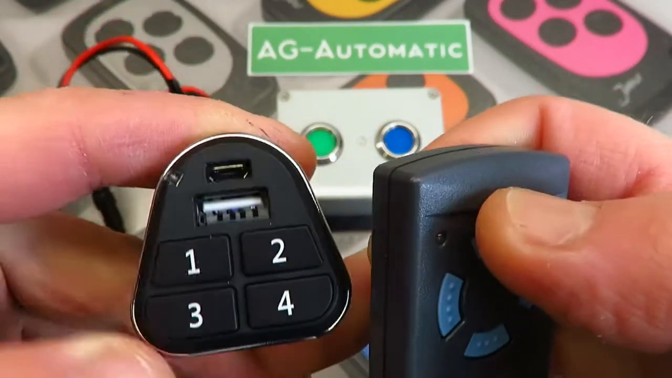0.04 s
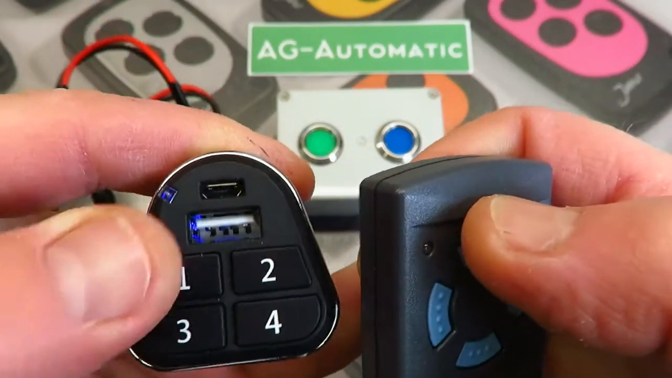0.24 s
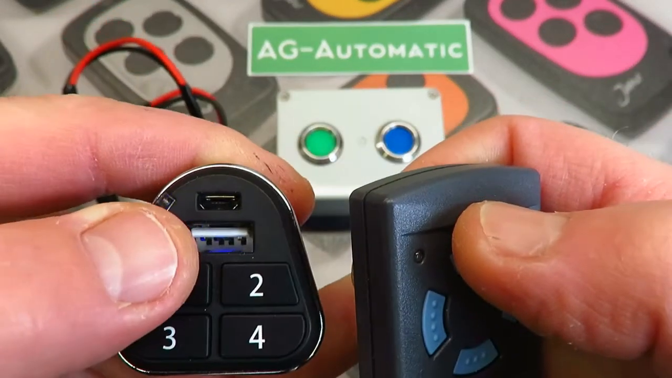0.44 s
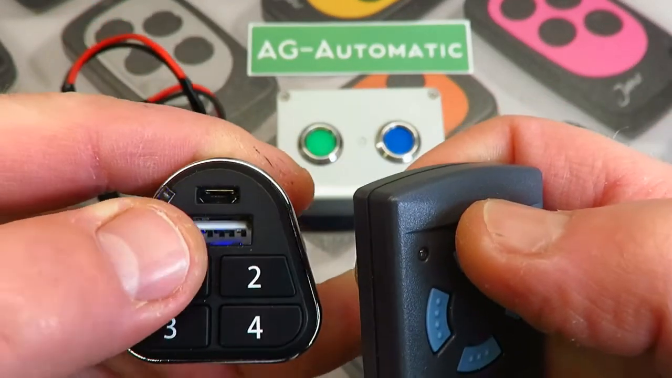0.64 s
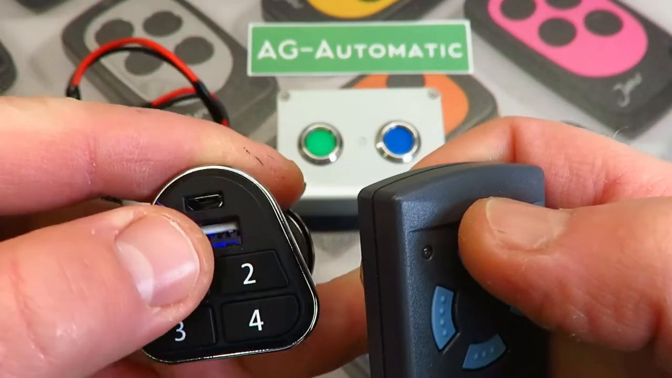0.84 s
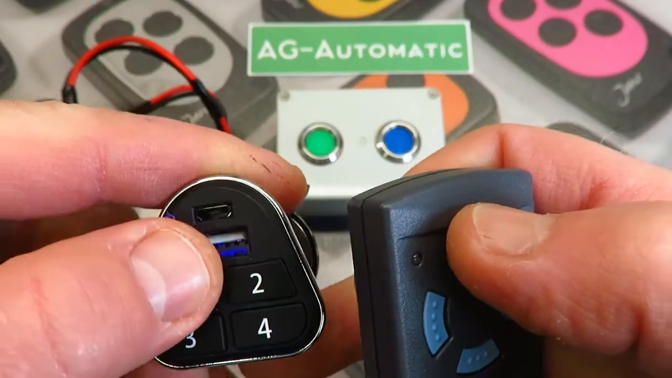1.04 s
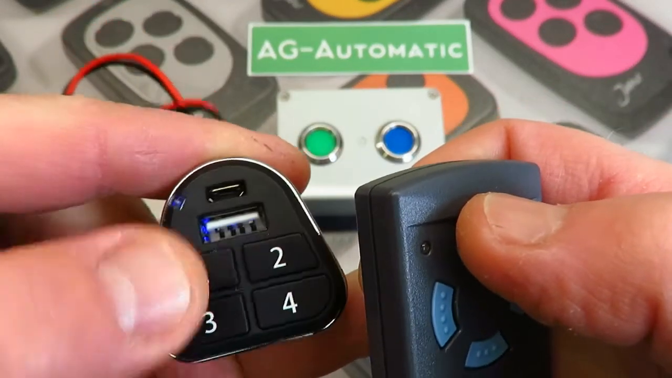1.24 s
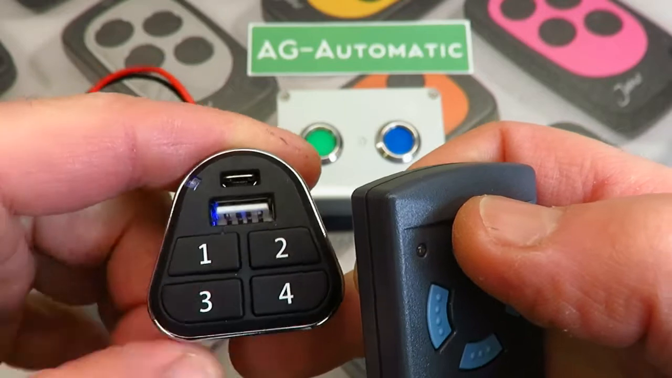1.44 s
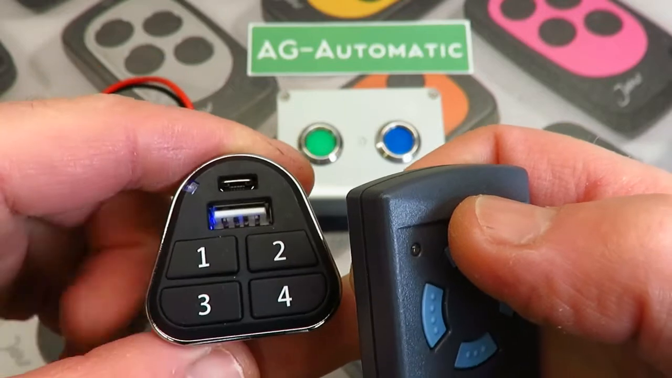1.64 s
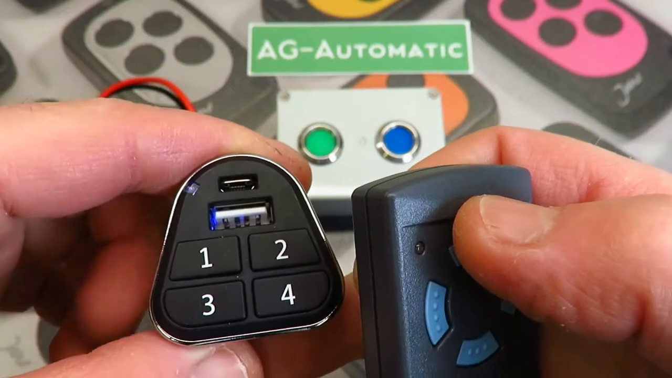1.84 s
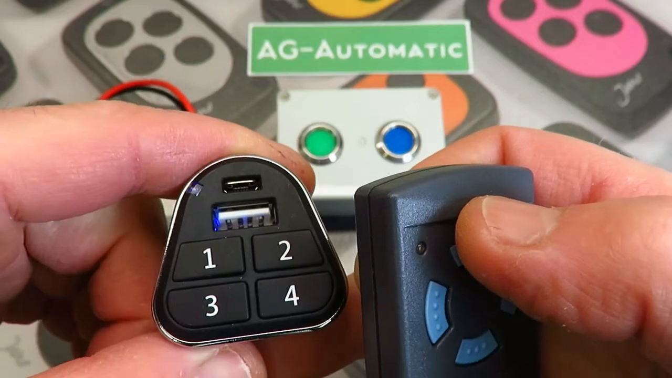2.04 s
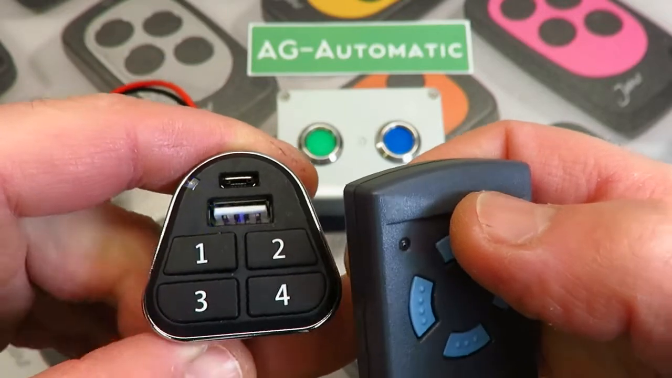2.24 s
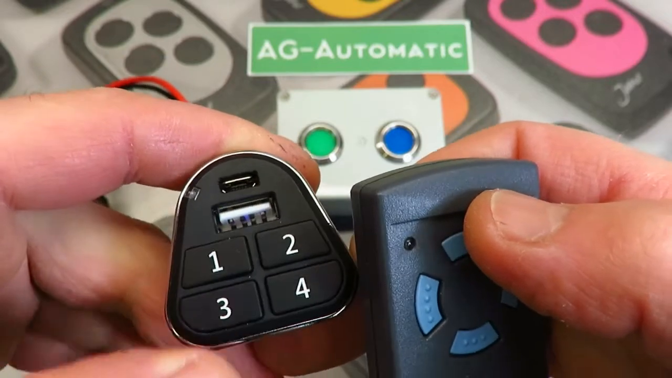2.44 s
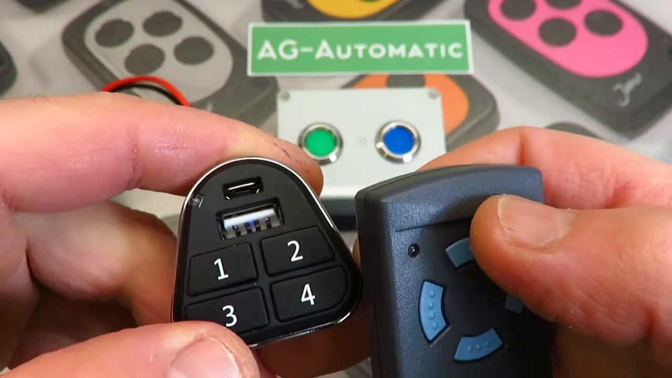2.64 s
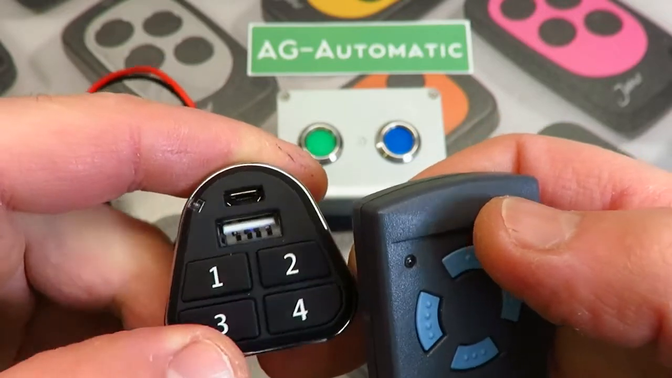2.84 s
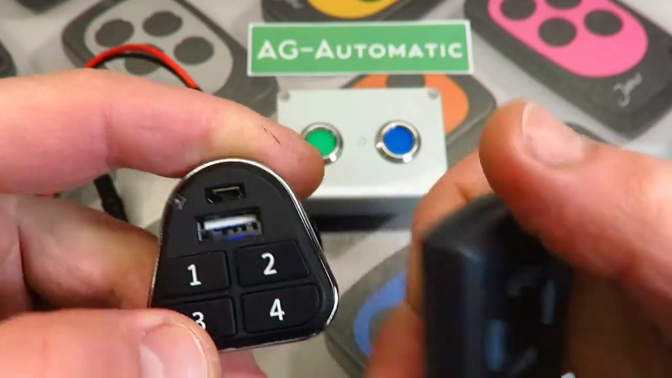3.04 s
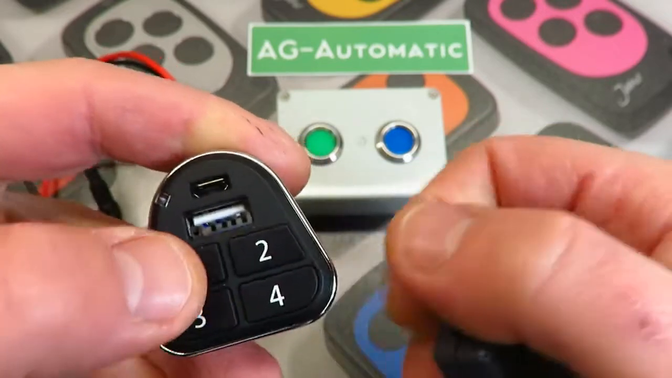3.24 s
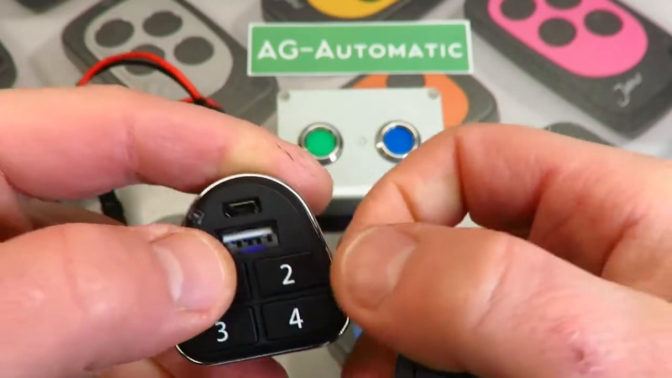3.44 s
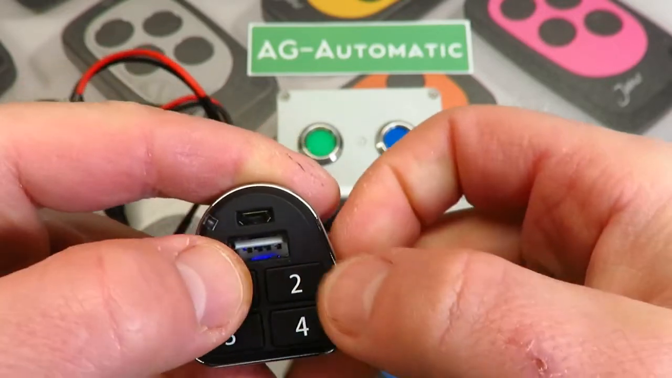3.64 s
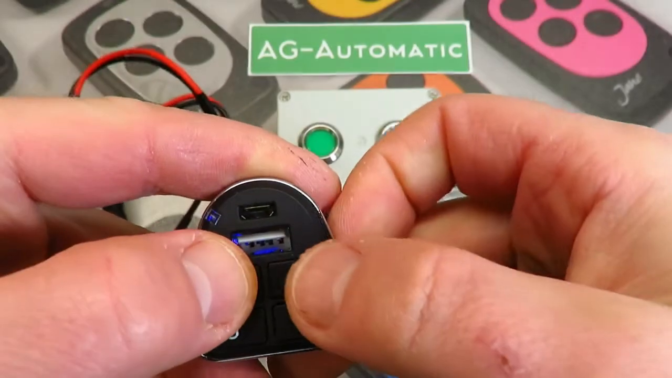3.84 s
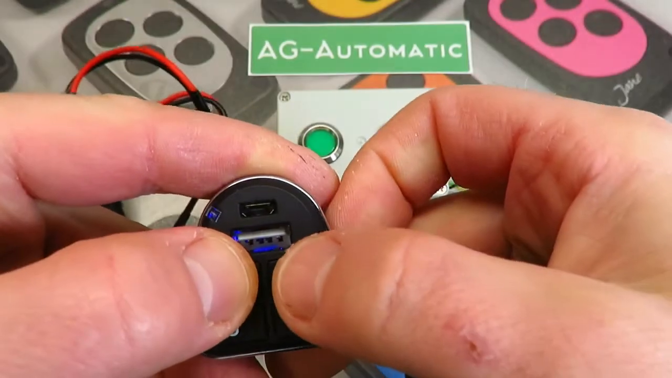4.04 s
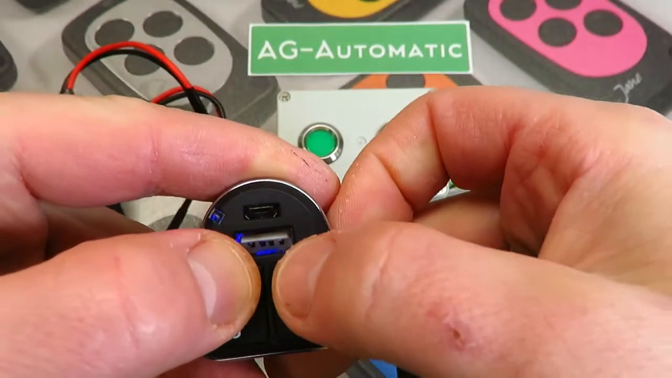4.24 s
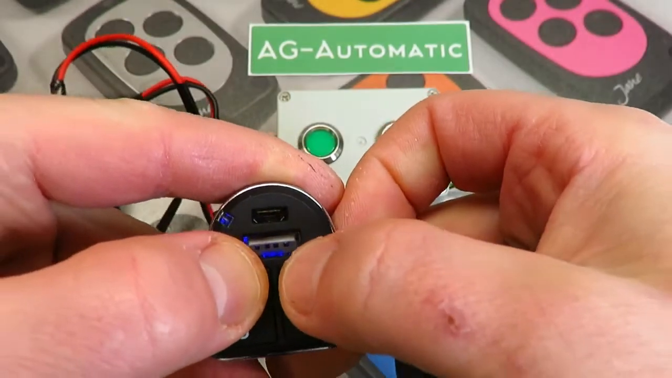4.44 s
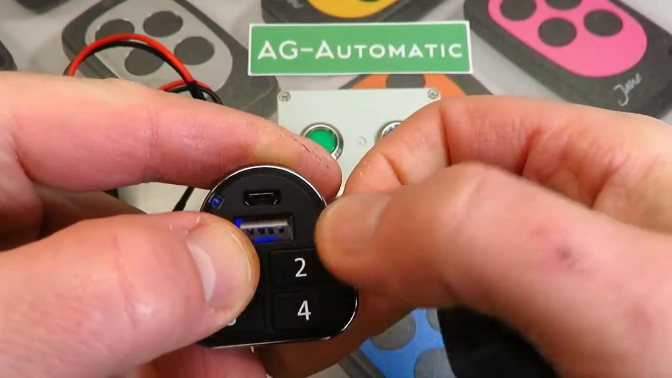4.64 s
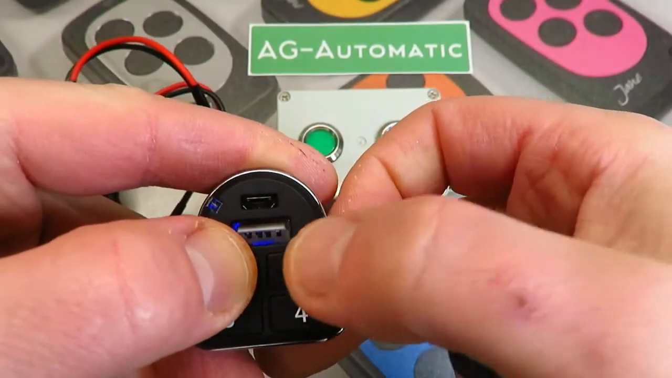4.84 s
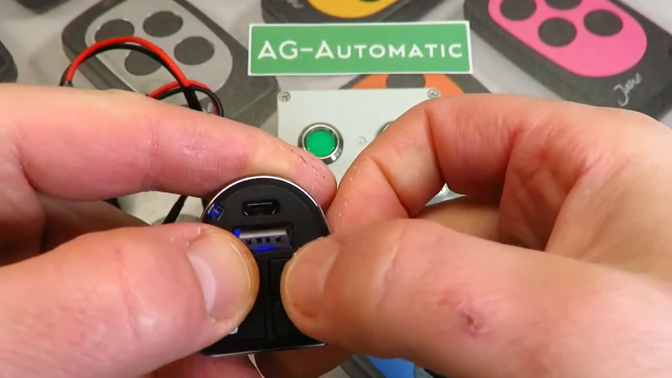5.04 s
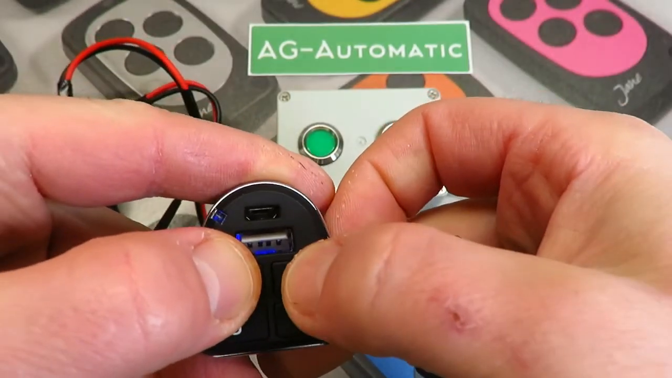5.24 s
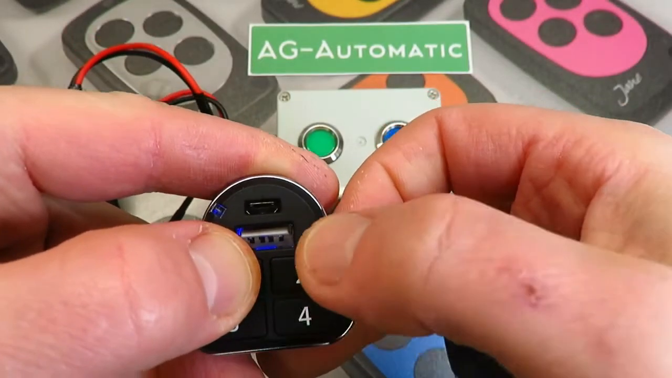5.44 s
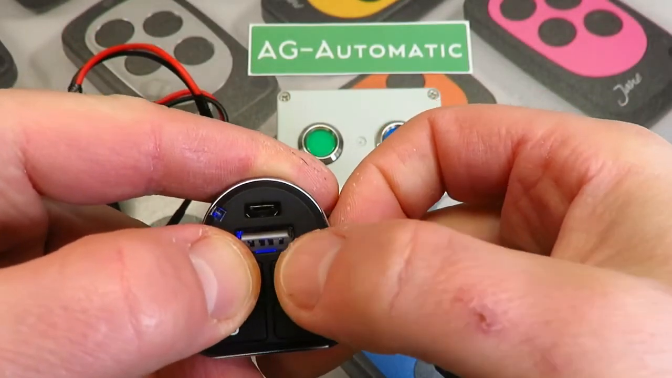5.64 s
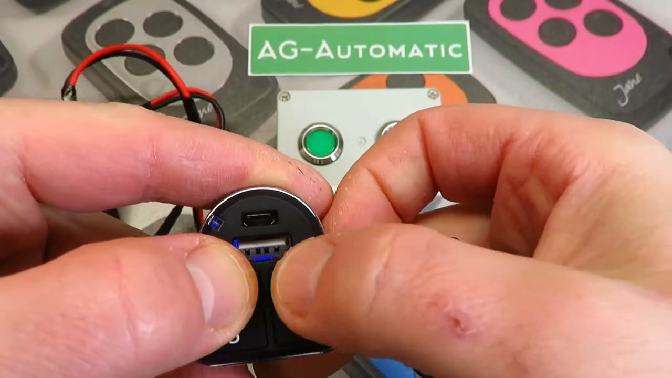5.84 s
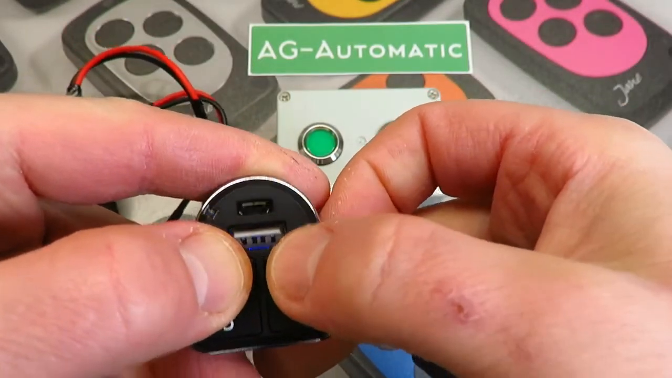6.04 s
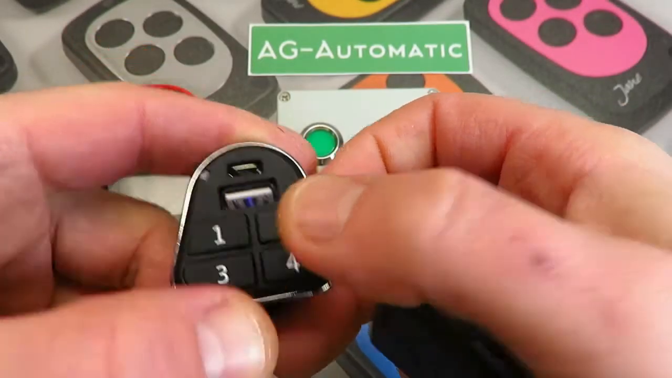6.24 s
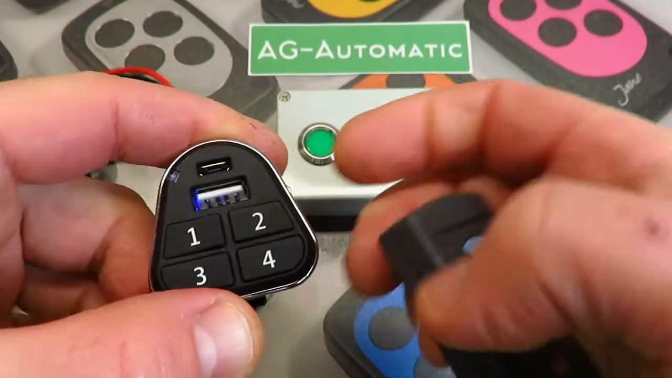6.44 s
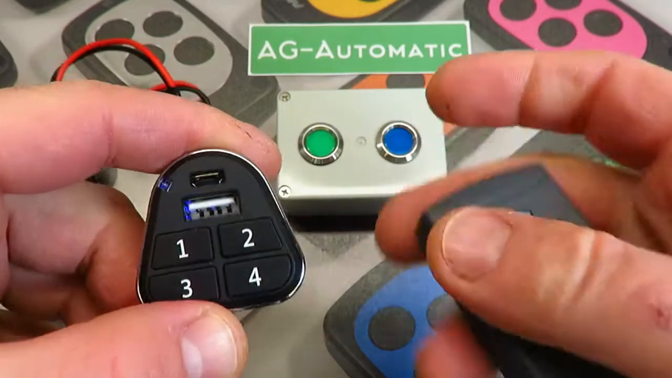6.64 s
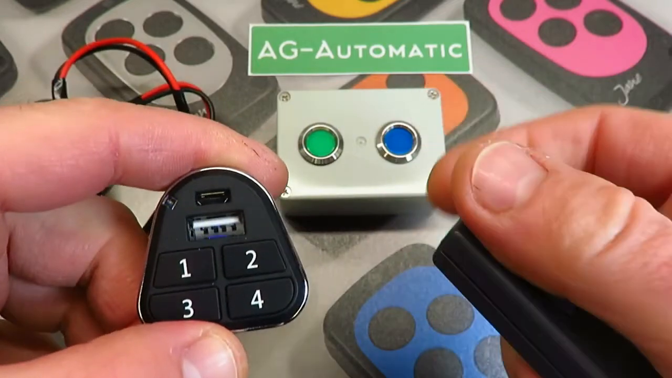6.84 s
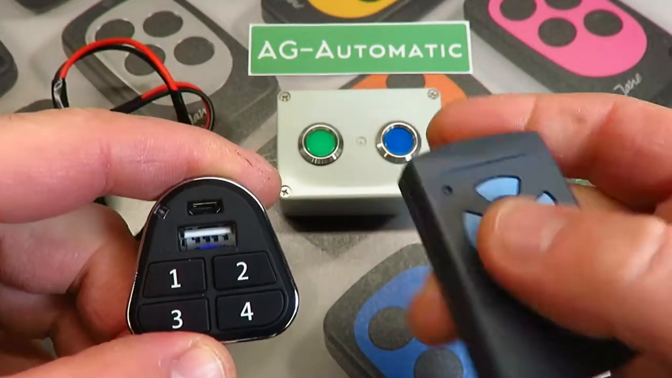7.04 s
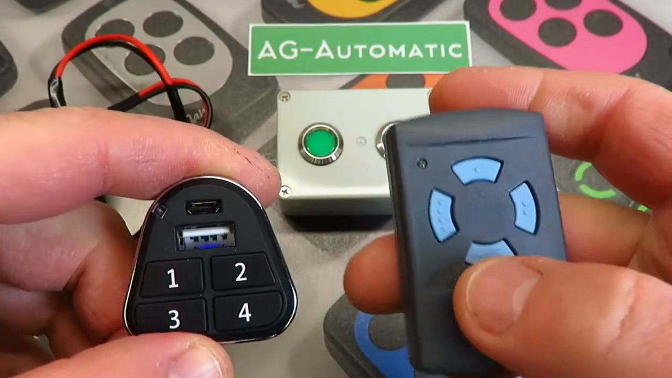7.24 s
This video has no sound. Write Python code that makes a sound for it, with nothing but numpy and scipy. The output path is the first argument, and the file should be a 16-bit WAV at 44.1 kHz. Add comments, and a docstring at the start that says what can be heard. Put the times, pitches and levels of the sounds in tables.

```python
"""In a quiet room, at a table, two small plastic remote controls are handled close to the microphone.
Thumbs press and release snap-dome buttons: each double crack rings briefly in the hollow case.
Light taps ring the same case. Skin slides over the plastic as bursts of tiny slips, and sometimes catches.
The hands shift with a dull rustle and soft bumps, all made from filtered grains and short tones.
Shaped noise gives the room rumble, the microphone hiss and a faint, thin band of hiss at the very top."""
import sys
import numpy as np
from scipy import signal
from scipy.fft import rfft, irfft, next_fast_len
from scipy.io import wavfile

SR = 44100
rng = np.random.default_rng(int(sys.argv[2]) if len(sys.argv) > 2 else 0)


def wav_record(signal):
    """Record a signal, one row per channel, as 16-bit PCM in the file named by sys.argv[1]."""
    frames = np.transpose(np.atleast_2d(signal))
    bounded = np.clip(frames, -1, 1)
    # unit amplitude maps onto the largest positive 16-bit level
    quanta = np.round(bounded * 32767).astype(np.int16)
    wavfile.write(sys.argv[1], SR, quanta)


N = 322371
TIME = np.arange(N) / SR

# A dome snaps down under the thumb. Columns:
# start_s, main_level_db (over 10 ms), main_pitch_hz, snap_pitch_hz, landing_delay_s,
# landing_db, after_ring_db, scatter_db,
# then levels relative to the main band: knock_db, body_db, snap_db, tick_db, air_db
BUTTON_PRESSES = [(0.5014, -34.5, 2880, 3920, 0.00037, 2.5, -14, -1.5, -28, -7.5, -1.5, -18, -33),
                  (1.0911, -20.5, 2400, 4360, 0.00078, -10, -16, -5.5, -25.5, -12.5, -5.5, -18.5, -24.5),
                  (3.8761, -17.7, 2500, 5120, 0.00074, -10, -33, -9, -24.5, -15, -6, -5, -20),
                  (4.4533, -20.5, 3010, 4580, 0.00031, -11, -16, -11.5, -32, -16.5, -2, -10, -25),
                  (5.261, -19, 2880, 5000, 0.00038, -4.5, -15, -8, -57, -15, -2.5, -25, -16),
                  (5.9984, -23.5, 2910, 5170, 0.000435, -10.5, -16, -10.5, -28, -8, -0.5, -16, -15.5)]
# A dome springs back up: same columns and units as the presses
BUTTON_RELEASES = [(1.3052, -26, 2134, 4140, 0.00077, -18, -20, -8.5, -17, -5.5, -32, -29, -32),
                   (4.6902, -30, 3050, 3770, 0.00065, -9, -8, -10.5, -23.5, -7.5, -40, -10, -15),
                   (5.4414, -34.5, 2790.0, 4280, 0.00054, -9, -11, -12, -23, -12.0, -10, -21, -51),
                   (6.2065, -35, 2030.0, 4390.0, 0.0007, -6, -37, -10, -15, -6, -33.0, -39.0, -48.0),
                   (6.2584, -23, 2120, 3720, 0.00149, -9, -1, -5.5, -21.5, -8.5, -28, -31, -45)]


def buttons():
    """Pressed domes snap short and bright; released domes sound duller and longer."""
    out = np.zeros((2, N))
    for row in [*BUTTON_PRESSES, *BUTTON_RELEASES]:
        start_s, level_db, *crack_settings, knock_db, body_db, snap_db, tick_db, air_db = row
        levels_db = level_db + np.array([knock_db, body_db, 0, snap_db, tick_db, air_db])
        add(out, start_s, click(*crack_settings, levels_db))
    return out


# Ringing of the plastic cases: pitch_hz, width_hz, level_db (each click's after-ring level is added)
CASE_RINGS = [(910, 190, -3), (1430, 200, 13), (1790, 57, 24), (2222, 190, 24), (2590, 140, 9.5),
              (3080, 130, 3), (3830, 200, 12.5), (4480, 86, 18.5), (4710, 250, 14.5), (6280, 245.0, 20),
              (6850, 180, 23), (11400, 2700, 20)]


def click(main_hz, snap_hz, landing_s, landing_db, ring_db, scatter_db, levels_db,
          main_width=1.166, snap_width=1.123, scatter_rise_s=0.0012, scatter_t60=0.029,
          side_db=-5.5, thud_db=-4.0):
    """Two quick contacts crack and ring the case, then scatter between fingers and table."""
    t = np.arange(SR // 14) / SR
    landing = np.sinc((t - landing_s) * SR)  # a second impulse, able to fall between two samples
    crack = signal.unit_impulse(len(t)) + from_db(landing_db) * landing

    swell = (1 - np.exp(-t / scatter_rise_s)) * from_db(-60 * t / scatter_t60)
    scatter = rng.standard_normal((2, len(t))) * from_db(scatter_db) * swell / np.linalg.norm(swell)
    drive = np.array([crack + scatter[0], from_db(side_db) * scatter[1]])
    sound = drive + from_db(ring_db) * body(drive, CASE_RINGS)

    # where and how hard the thumb bears sets the strength of each band
    knock = from_db(thud_db) * band(sound, 370, 560) - band(sound, 710, 1036)
    low_body = band(sound, 1355, 1815)
    main = band(sound, main_hz / max(main_width, 1.05), main_hz * main_width)
    snap = band(sound, snap_hz / max(snap_width, 1.05), snap_hz * snap_width)
    tick = band(sound, 5980, 7680)
    air = band(sound, 9800, 12540, order=3)

    ten_ms = SR / 100
    mixed = np.zeros_like(sound)
    for part, level_db in zip([knock, low_body, main, snap, tick, air], levels_db):
        # set each band's level from the energy of its common (mid) part
        mixed += part * from_db(level_db) * np.sqrt(ten_ms / np.sum(part[0] ** 2))
    return stereo(*mixed)


# Light taps of a nail or a loose part on the case:
# start_s, main_level_db (over 10 ms), brightness_db, main_pitch_hz, after_ring_db
CASE_TAPS = [(0.152, -56, 11, 2410, -25), (0.4277, -60.5, 17, 2420, -29), (0.1993, -44, 18, 2370, -22),
             (0.2035, -45.5, 13, 2350, -23), (0.882, -56, 11, 2400, -13), (1.006, -55, 7, 2400, -13),
             (1.346, -45, 9, 2370, -13), (3.262, -46, 3, 2650, -22), (3.367, -41, 6, 2430, -15),
             (3.4492, -51.5, -3, 2450, -16), (3.9433, -43.5, 2, 2650, -16), (5.1207, -44, 14.5, 2470, -34),
             (5.4537, -48, -11, 2400, -28), (5.509, -51, 8, 2550, -26), (5.815, -47, 2, 2640, -23),
             (6.2164, -43, -1, 2660, -32), (6.303, -48.5, 18.5, 2300, -16), (6.7915, -42.5, 0, 2300, -9),
             (6.959, -34, 2, 2270, -11)]
TAP_LANDING_S, TAP_LANDING_DB = 0.000335, -10   # the second touch of a tap
TAP_SNAP_HZ, TAP_SCATTER_DB = 4040, -0.5
# band levels relative to the main band; brightness is added to snap (in part), tick and air
TAP_KNOCK_DB, TAP_BODY_DB, TAP_SNAP_DB, TAP_TICK_DB, TAP_AIR_DB = -44, -12, -15.5, -26.5, -26.5
TAP_SNAP_SHARE = 0.46   # share of the brightness that reaches the snap band


def taps():
    """Light contacts ring the same case; the harder the touching surface, the more treble."""
    out = np.zeros((2, N))
    for start_s, level_db, bright_db, main_hz, ring_db in CASE_TAPS:
        snap_db = TAP_SNAP_DB + TAP_SNAP_SHARE * bright_db
        tick_db, air_db = TAP_TICK_DB + bright_db, TAP_AIR_DB + bright_db
        levels_db = level_db + np.array([TAP_KNOCK_DB, TAP_BODY_DB, 0, snap_db, tick_db, air_db])
        tap = click(main_hz, TAP_SNAP_HZ, TAP_LANDING_S, TAP_LANDING_DB, ring_db, TAP_SCATTER_DB,
                    levels_db, main_width=1.256, snap_width=1.17, scatter_rise_s=0.00084, side_db=-10.0)
        add(out, start_s, tap)
    return out


# Skin slides over a case: peak_s, rise_s, fall_s, case_db, brush_db, scratch_db
SKIN_SLIDES = [(0.13, 0.19, 0.13, -63.5, -60, -75), (1.395, 0.085, 0.069, -69.5, -54, -69),
               (1.585, 0.04, .05, -64, -81, -62.5), (2.485, 0.018, 0.15, -62, -67, -64),
               (3.06, 0.038, 0.059, -52, -55, -58), (3.195, .04, 0.097, -52, -62.5, -62),
               (3.28, 0.067, 0.15, -46, -55, -50.5), (3.35, 0.041, 0.05, -48, -56, -55),
               (3.48, 0.12, 0.092, -55, -57, -66), (3.585, 0.034, 0.085, -49.5, -62, -90),
               (3.638, 0.049, 0.08, -42, -48, -55.5), (3.815, 0.045, 0.11, -56.5, -58.5, -79),
               (4.712, .02, 0.06, -55.5, -59, -56), (5.49, 0.043, 0.048, -58, -61, -61),
               (6.36, 0.11, 0.051, -60, -45.5, -59.5), (6.45, 0.22, 0.85, -53, -61.5, -77),
               (6.668, 0.074, 0.082, -46.5, -49, -61), (6.805, 0.079, 0.23, -39.5, -53, -55.5),
               (6.89, 0.19, 0.14, -43.5, -50.5, -57.5), (6.96, 0.035, 0.056, -30.5, -40, -42.5),
               (7.175, 0.083, 0.11, -38.5, -42.5, -47.5)]
# Soft friction of skin: pitch_hz, level_db (per Hz, relative)
BRUSH_COLOUR = [(900, -6.5), (1380, 8), (2000, -1), (2900, 0.5), (3600, 2), (4900, 1), (6000, -9),
                (9000, -16), (16000, -50)]
# Sharp friction of edges and nails: pitch_hz, level_db (per Hz, relative)
SCRATCH_COLOUR = [(2000, -10), (4500, -3), (6300, 2.5), (7600, 0.5), (9500, -1), (13300, 0), (16000, -42)]


def sliding(case_side_db=-11.0, brush_side_db=-8.0, scratch_side_db=-1.5):
    """Slips of skin wake the case and brush its matt surface; edges scratch in finer, sharper grains."""
    case_gain, brush_gain, scratch_gain = strokes(SKIN_SLIDES)
    # two independent noises each: one common to both ears, one opposed
    brush = [brush_gain * friction(grains(1800, 3.0, judder_db=2.5), BRUSH_COLOUR) for _ in range(2)]
    scratch = [scratch_gain * friction(grains(3600, 2.2, judder_db=1.7), SCRATCH_COLOUR)
               for _ in range(2)]
    mid = case_gain * rubbed_case() + brush[0] + scratch[0] + catches()
    side = from_db(case_side_db) * case_gain * rubbed_case()
    side += from_db(brush_side_db) * brush[1]
    side += from_db(scratch_side_db) * scratch[1]
    return stereo(mid, side)


# The strongest resonance of a rubbed case shifts with the grip: time_s, pitch_hz
CAVITY_PITCH = [(3.3, 2230), (3.65, 2209), (6.45, 2281), (6.8, 2260), (6.96, 2337), (7.18, 2253)]
CAVITY_WIDTH_HZ, CAVITY_DB = 96, 7   # level relative to the weaker resonances
# Weaker resonances that sliding wakes: pitch_hz, width_hz, level_db (before a random wander)
RUBBED_RINGS = [(1664, 65, -5), (1974, 55, -10), (2540, 110, -15.5), (2800, 110, 0), (3150, 150, 0)]


def rubbed_case(wander_db=-2.0, wander_hz=45.7):
    """The grip bends the strongest resonance; the moving finger damps now one other ring, now another."""
    slips = grains(1600, 2.9, judder_db=2.3)
    cavity_hz = np.interp(TIME, *np.transpose(CAVITY_PITCH))
    mean_hz = cavity_hz.mean()
    steady_cavity = resonate(slips, mean_hz, CAVITY_WIDTH_HZ)
    # read the steady ring faster or slower to bend its pitch
    read_at = np.cumsum(cavity_hz / mean_hz)
    cavity = np.interp(read_at, np.arange(N), steady_cavity)
    rings = np.zeros(N)
    for hz, width, db in RUBBED_RINGS:
        rings += from_db(db + wander_db * waver(wander_hz)) * resonate(slips, hz, width)
    return rms_one(band(from_db(CAVITY_DB) * cavity + rings, 1600, 2460))


# Skin catches and judders on an edge: middle_s, level_db (averaged over its length), length_s, pitch_hz
SKIN_CATCHES = [(0.128, -59, 0.025, 2360), (0.878, -58, 0.056, 2450), (2.488, -59.5, 0.044, 2840),
                (3.058, -52.5, 0.036, 2920), (3.259, -47, 0.011, 2610), (3.276, -40.5, 0.022, 2680),
                (3.307, -46, 0.025, 2170), (3.449, -50, 0.013, 2450), (3.633, -47.5, 0.022, 3400),
                (3.644, -38.5, 0.035, 2146), (3.811, -57.5, 0.052, 3000), (5.486, -61, 0.033, 2700),
                (6.31, -45, 0.019, 2250), (6.44, -51, .02, 2320), (6.73, -44, 0.026, 2240),
                (6.742, -52, .01, 2210), (6.794, -37.5, 0.014, 2190), (6.804, -37, 0.011, 2280),
                (6.815, -41, .009, 2230), (6.794, -53.5, 0.095, 1700), (6.868, -52.5, 0.071, 1690),
                (6.934, -43, 0.059, 1710), (6.961, -25.5, 0.013, 2346), (6.962, -37, 0.026, 1670),
                (7.188, -50.5, 0.1, 1690)]


def catches(slips_per_s=380.0, sharpness=16.7, tick_db=-36.5):
    """A short run of uneven stick-slip pulses rings one resonance of the case; each slip also ticks."""
    out, t = np.zeros(N), np.arange(SR // 10) / SR
    for middle_s, level_db, length_s, hz in SKIN_CATCHES:
        slips = np.zeros(len(t))
        slip_s = np.cumsum(rng.uniform(.5, 1.5, size=40)) / slips_per_s
        slip_s = slip_s[slip_s < min(length_s, t[-1])]
        strength = rng.uniform(.55, 1, size=40)[:len(slip_s)]
        slips[(slip_s * SR).astype(int)] = np.sin(np.pi * slip_s / length_s) * strength

        ring = band(resonate(slips, hz, hz / sharpness), hz / 1.18, hz * 1.5)
        ring = ring + from_db(tick_db) * band(slips, 3000, 11000, order=1)
        unit_power = np.sqrt(length_s * SR / (np.sum(ring ** 2) + 1e-20))
        add(out, middle_s - length_s / 2, from_db(level_db) * ring * unit_power)
    return out


# Ringing of the thin case walls: pitch_hz, width_hz, level_db (relative to the bare friction)
WALL_RINGS = [(3520, 110, 1.5), (3860, 80, 3), (4190, 63, 1.5), (4930, 81, -6), (6100, 130, 2),
              (7680, 83, -1.5)]


def friction(slips, spectrum):
    """Slips are heard directly and through the thin walls of the case."""
    return coloured(slips + body(slips, WALL_RINGS), spectrum)


def grains(per_s, spread_db, judder_db=0.0, judder_hz=91.7):
    """Tiny slips of skin ridges come at random, uneven in size, and swell as the pressure wavers."""
    sizes = from_db(spread_db * np.minimum(rng.exponential(1, N), 4) + judder_db * waver(judder_hz))
    happens = rng.random(N) < per_s / SR
    return rms_one(happens * sizes * rng.choice([-1, 1], N))


STROKE_DEPTH_DB = 20   # drop in level one rise time before the peak and one fall time after it
STROKE_ROUNDNESS = 1.43   # 1 = pointed peak, 2 = bell


def stroke(peak_s, rise_s, fall_s):
    """A stroke of the hand speeds up and slows; this gain follows its sound, 1 at the peak."""
    away = np.maximum((peak_s - TIME) / rise_s, (TIME - peak_s) / fall_s)
    return from_db(-STROKE_DEPTH_DB * np.minimum(away, 10) ** STROKE_ROUNDNESS)


def strokes(rows):
    """Gain in time for each level column of a table; overlapping strokes add in power."""
    power = 0
    for peak_s, rise_s, fall_s, *levels_db in rows:
        power = power + np.outer(from_db(levels_db), stroke(peak_s, rise_s, fall_s)) ** 2
    return np.sqrt(power)


# A hand shifts its grip: peak_s, rise_s, fall_s, dull_db, hollow_db
GRIP_SHIFTS = [(0.155, 0.014, 0.025, -47, -52), (1.41, 0.078, 0.063, -45.5, -49.5),
               (1.73, 0.067, 0.053, -53, -62), (3.07, 0.1, 0.07, -47.5, -55.5),
               (4.605, 0.044, 0.064, -51.5, -62), (6.347, 0.05, 0.08, -40, -39),
               (6.628, 0.072, 0.045, -42.5, -46.5), (6.69, 0.12, 0.074, -43.5, -44)]
# Dull resonances of hands and table: pitch_hz, width_hz, level_db (relative)
DULL_RINGS = [(117, 36, -1), (190, 52, 11.5), (346, 76, 6)]
# Resonances of the cupped hand: pitch_hz, width_hz, level_db (relative)
HOLLOW_RINGS = [(567, 39, 8), (740, 100, -14)]
# Soft bumps of a finger: start_s, level_db (peak, before decay), pitch_hz, fade_s (time to fall 60 dB)
FINGER_BUMPS = [(0.1523, -39.5, 173, 0.045), (0.4278, -35.5, 112, 0.12), (3.062, -46, 178, 0.24),
                (6.337, -32.5, 175, 0.078), (6.408, -36, 170, 0.075), (6.478, -43, 187, 0.076),
                (6.594, -36, 185, 0.11)]


def hands(knock_db=-3.0):
    """The grip rustles through dull and hollow resonances; soft bumps are low tones that die quickly."""
    dull_gain, hollow_gain = strokes(GRIP_SHIFTS)
    rustle = grains(3000, 0.79)
    dull = rms_one(band(body(rustle, DULL_RINGS), 76, 750))
    hollow = rms_one(band(body(rustle, HOLLOW_RINGS), 260, 1860))
    mid = dull_gain * dull + hollow_gain * hollow

    t = np.arange(SR // 5) / SR
    knock = band(body(signal.unit_impulse(len(t)), DULL_RINGS + HOLLOW_RINGS), 79, 4500)
    knock = from_db(knock_db) * knock / np.abs(knock).max()
    for start_s, level_db, hz, fade_s in FINGER_BUMPS:
        thud = np.sin(2 * np.pi * hz * t) * from_db(-60 * t / fade_s)
        add(mid, start_s, from_db(level_db) * (knock - thud))
    return stereo(mid, 0)


ROOM_T60_S, ROOM_DB = 0.15, -19   # time to fall 60 dB; level of the tail


def room(x):
    """The room answers with a faint diffuse tail of fading noise, different at each ear."""
    t = np.arange(SR // 2) / SR
    fade = from_db(-60 * t / ROOM_T60_S) * (1 - np.exp(-t / 0.00059))
    tail = band(rng.standard_normal((2, len(t))), 150, 11000, order=1) * fade
    tail /= np.sqrt(np.sum(tail ** 2, axis=1, keepdims=True))
    return from_db(ROOM_DB) * signal.fftconvolve(x, tail, axes=1)[:, :N]


# Rumble and hiss common to both ears: pitch_hz, level_db (per Hz, relative)
FLOOR_MID_COLOUR = [(20, -24), (40, -5.5), (65, 0), (120, -7), (172, -8), (235, -16), (310, -15),
                    (560, -21), (720, -20), (900, -23), (2900, -29.5), (3800, -32.5), (5400, -33),
                    (6600, -30.5), (7900, -35), (11500, -49.5), (13500, -72)]
# Rumble and hiss opposed between the ears: pitch_hz, level_db (per Hz, relative)
FLOOR_SIDE_COLOUR = [(40, -15), (90, -20.5), (200, -7), (440, -5.5), (580, -10.5), (1200, -13),
                     (2500, -16.5), (4500, -21.5), (9000, -22.5), (15500, -18)]
FLOOR_MID_DB, FLOOR_SIDE_DB = -50.5, -51
TOP_HISS_HZ, TOP_HISS_WIDTH_HZ = 15580, 130   # the band reaches this width to either side
TOP_HISS_SIDE_DB, TOP_HISS_MID_DB = -73.5, -78


def floor(waver_db=-0.7, waver_hz=4.5):
    """Shaped noise makes rumble and wide hiss, wavering gently low down; a thin band of hiss tops it."""
    mid, side, top_noise = rng.standard_normal((3, N))
    low_hz, high_hz = TOP_HISS_HZ - TOP_HISS_WIDTH_HZ, TOP_HISS_HZ + TOP_HISS_WIDTH_HZ
    top_hiss = rms_one(band(top_noise, low_hz, high_hz))
    air = stereo(from_db(FLOOR_MID_DB) * coloured(mid, FLOOR_MID_COLOUR),
                 from_db(FLOOR_SIDE_DB) * coloured(side, FLOOR_SIDE_COLOUR))
    air = air + (from_db(waver_db * waver(waver_hz)) - 1) * band(air, 150, 1500, order=1)
    return air + stereo(from_db(TOP_HISS_MID_DB) * top_hiss, from_db(TOP_HISS_SIDE_DB) * top_hiss)


def from_db(db):
    """Turn decibels into a gain."""
    return 10 ** (np.asarray(db) / 20)


def rms_one(x):
    """Scale to unit power."""
    return x / np.sqrt(np.mean(x ** 2) + 1e-20)


def add(out, start_s, sound):
    """Mix a sound in at a time, cut off at the end."""
    at = int(round(start_s * SR))
    out[..., at:at + sound.shape[-1]] += sound[..., :N - at]


def band(x, low_hz, high_hz, order=2):
    """Keep only the pitches between two limits."""
    sos = signal.butter(order, [low_hz, min(high_hz, .45 * SR)], "band", fs=SR, output="sos")
    return signal.sosfilt(sos, x)


def resonate(x, hz, width):
    """Ring at one pitch, with gain about 1 there; a narrower width in Hz rings longer."""
    r = np.exp(-np.pi * width / SR)
    top = np.array([1, 0, -1]) * (1 - r * r) / 2
    bottom = [1, -2 * r * np.cos(2 * np.pi * hz / SR), r * r]
    return signal.lfilter(top, bottom, x + 1e-18)


def body(x, modes):
    """An object rings at several pitches side by side."""
    return sum(from_db(db) * resonate(x, hz, width) for hz, width, db in modes)


def coloured(x, spectrum):
    """Give a long noise a smooth spectrum and unit power."""
    hz, db = np.transpose(spectrum)
    size = next_fast_len(N)
    f = np.arange(size // 2 + 1) * SR / size
    gain = from_db(np.interp(np.log(f + 1), np.log(hz), db))
    return rms_one(irfft(rfft(x, size) * gain, size)[..., :N])


def waver(per_s):
    """Wander at random, heading for a new value so many times a second."""
    return np.interp(TIME * per_s, np.arange(N), rng.standard_normal(N))


def stereo(mid, side):
    """Make left and right from the common and the opposed part."""
    return np.array([mid + side, mid - side])


# Where the busy hand is: time_s, left_minus_right_db
HAND_POSITION = [(0.5, 0.7), (1.1, 1.5), (3.0, 0), (6.3, 1), (6.75, -2.5), (7.3, -2)]


def scene():
    """Clicks and handling sound in the room; near the end the hand moves to the right."""
    pan_db = np.interp(TIME, *np.transpose(HAND_POSITION))
    near = (buttons() + taps() + sliding()) * from_db([pan_db / 2, -pan_db / 2]) + hands()
    return near + room(near) + floor()


CUTOFF_HZ = 16000


def record(dry):
    """The hardest cracks are rounded a little, and the top is cut steeply."""
    rounded = dry / (1 + (dry / .92) ** 6) ** (1 / 6)
    steep_cut = signal.ellip(12, .1, 100, CUTOFF_HZ, fs=SR, output="sos")
    return signal.sosfilt(steep_cut, rounded)


dry = scene()
out = record(dry)
wav_record(out)
```